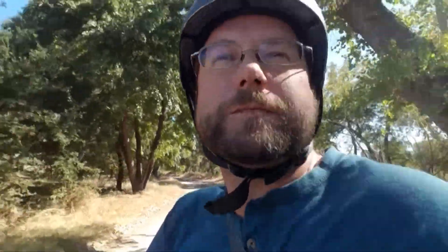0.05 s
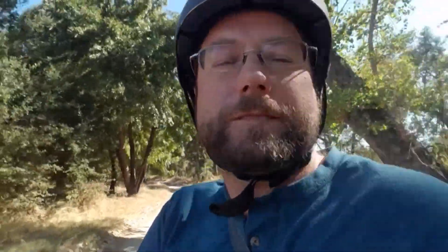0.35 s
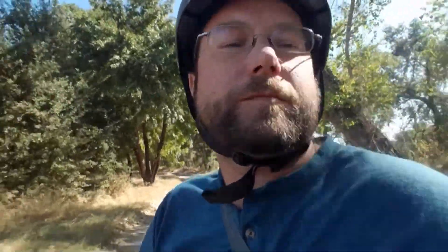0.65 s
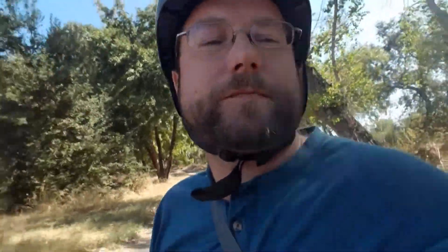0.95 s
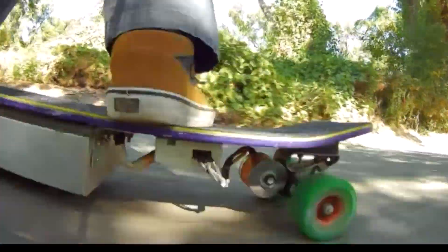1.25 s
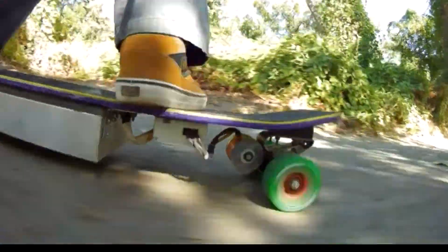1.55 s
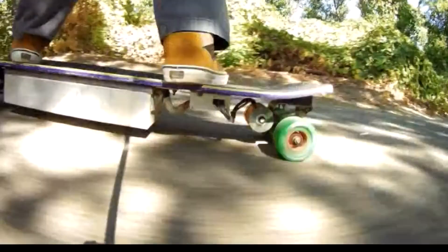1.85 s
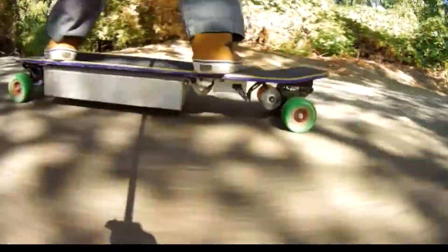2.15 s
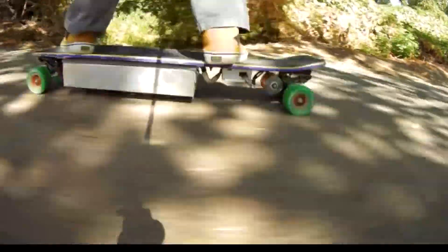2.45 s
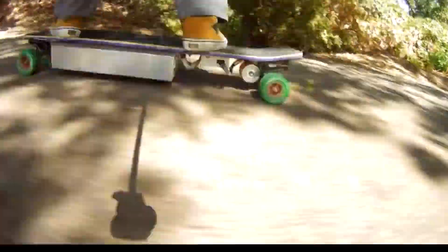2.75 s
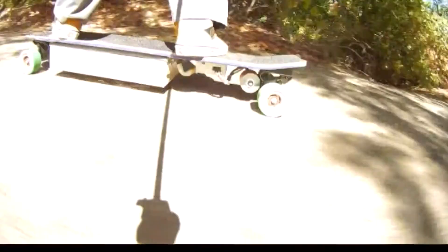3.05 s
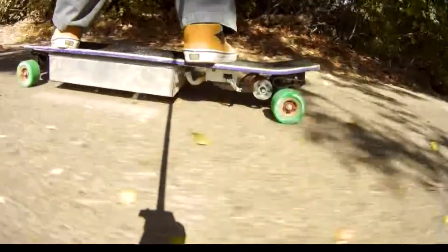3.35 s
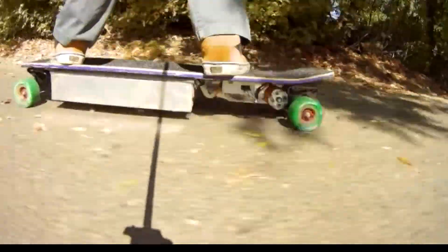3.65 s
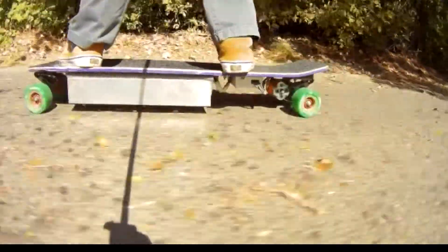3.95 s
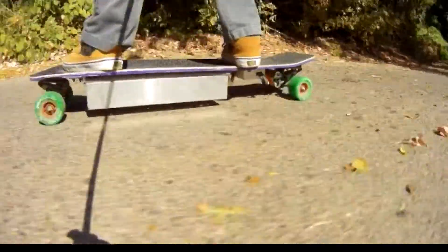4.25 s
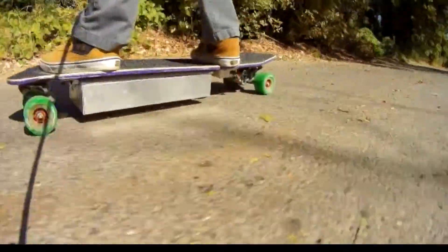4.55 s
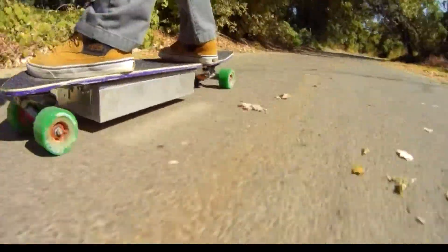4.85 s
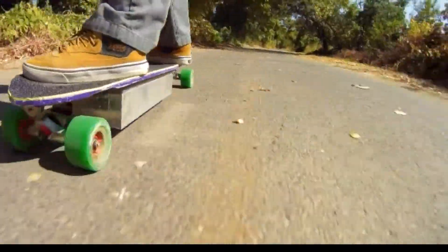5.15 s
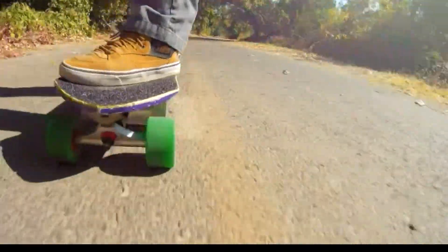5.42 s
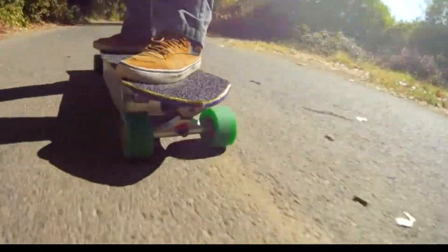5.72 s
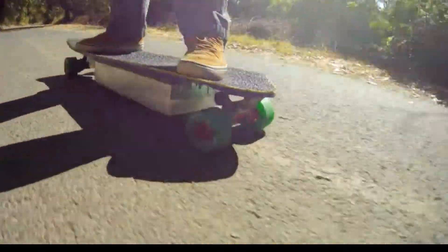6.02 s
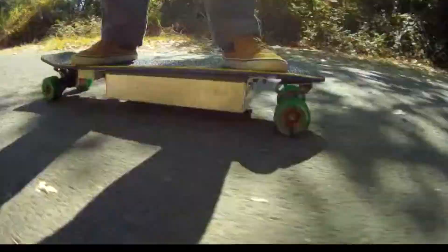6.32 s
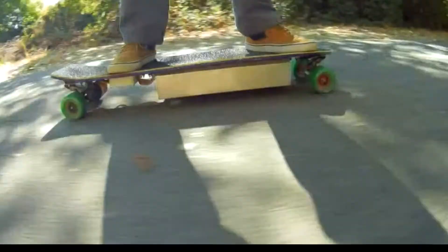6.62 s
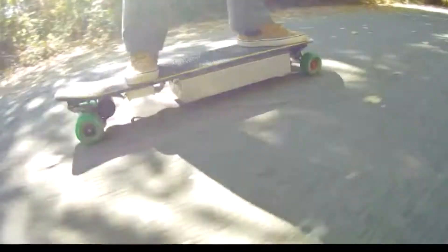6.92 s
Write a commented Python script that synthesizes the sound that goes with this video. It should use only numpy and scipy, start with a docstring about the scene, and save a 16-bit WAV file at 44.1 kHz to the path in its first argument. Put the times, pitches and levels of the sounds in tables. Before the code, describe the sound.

A second of gusty wind cuts to an electric skateboard's wheels roaring over pavement, with pebble knocks, rattles and a thin motor whistle.

```python
"""Wind buffets the microphone at head height, over the faint hiss of an electric skateboard on a path.
After a short silent break the board is heard from beside its wheels: coarse asphalt shakes deck and
wheels, pebbles knock, and loose hardware rattles on the battery box and trucks. The motor drive
whistles, the wheels squeal and scrub in turns, and a bushing groans as the rider leans.
Dry leaves snap under the wheels, loudest at the end."""
import sys
import numpy as np
from scipy import signal
from scipy.fft import rfft, irfft
from scipy.io import wavfile

SR = 44100
rng = np.random.default_rng(int(sys.argv[2]) if len(sys.argv) > 2 else 0)


def waveform_to_disk(signal):
    """Save audio, clipped to [-1, 1], as 16-bit WAV at the path in sys.argv[1]."""
    frames = np.transpose(np.atleast_2d(signal))
    scaled = np.clip(frames, -1, 1) * 32767
    samples = np.round(scaled).astype(np.int16)
    wavfile.write(sys.argv[1], SR, samples)


N = 312228
T = np.arange(N) / SR
WIND_END_S, RIDE_START_S = 1.033, 1.092  # the silent break lies between


# How hard the road drives the board. Each row: time in seconds, then deck rumble, wheel roar and grit
# in relative dB.
ROAD_LEVELS = [(1.1, -20, -22.5, -38.5), (1.45, -24, -27.5, -46.5), (1.78, -23, -24, -44),
               (1.98, -23, -28.5, -48), (2.3, -23.5, -26.5, -46.0), (3.0, -26.5, -29, -48.5),
               (3.2, -26, -27, -47.0), (3.5, -26.9, -26.5, -49), (3.8, -23.5, -26, -45),
               (4.3, -23.5, -27.5, -47.5), (4.5, -28.5, -27, -47), (4.68, -26.5, -23.5, -39.5),
               (5.15, -29, -28, -46), (5.6, -31.5, -31, -43), (5.95, -30, -33.5, -47.5),
               (6.2, -29, -32.5, -46.5), (6.45, -29.5, -24, -47.5), (6.6, -28, -30.0, -48),
               (6.88, -29.4, -25, -49.5), (6.97, -30, -34, -45.9)]


def shaking(s):
    """The road shakes deck, wheels, box and grit: their relative levels in dB at time s."""
    times, *columns = np.transpose(ROAD_LEVELS)
    deck_db, wheel_db, grit_db = [np.interp(s, times, c) for c in columns]
    box_db = 0.68 * wheel_db + 0.32 * grit_db - 4  # the box is shaken through the wheels and by grit
    return np.array([deck_db, wheel_db, box_db, grit_db])


# Fine dust under the wheels. Each row: time in seconds, relative level in dB.
DUST_LEVELS = [(1.1, -59), (2.0, -64), (2.5, -61.5), (3.4, -64), (4.15, -60.5), (5.2, -64.5), (6.1, -65.6),
               (6.3, -63), (6.75, -67)]
# Tone colours: low deck, roaring wheels, clacking battery box, bright grit, fizzing dust.
# Each row: frequency in Hz, gain in dB.
DECK_SPECTRUM = [(20, -19), (45, -15), (80, -11), (130, -5), (200, -0.5), (270, -0.5), (350, 0.5),
                 (450, -1), (600, -1.5), (760, -3.5), (880, -5.5), (1100, -7.5), (1500, -19), (2500, -60.5)]
WHEEL_SPECTRUM = [(500, -40), (900, -5.5), (1150, -6.5), (1370, -1), (1600, -1), (1780, -5.5), (2000, -14),
                  (2300, -14), (3500, -44.5)]
BOX_SPECTRUM = [(1300, -36), (2080, -10), (2420, 2), (2650, -3), (2800, -4.5), (3000, -7), (3300, -12),
                (3700, -14.5), (4600, -34), (6000, -55)]
GRIT_SPECTRUM = [(2200, -32.5), (3400, 2.5), (3900, -2), (4300, -1), (4650, -2), (4950, -8), (5250, -20.5),
                 (5600, -12), (6300, -10), (6700, -16), (7150, -29), (9000, -28), (14000, -49)]
DUST_SPECTRUM = [(4000, -10), (7000, -0.5), (8600, 1.5), (9500, 4), (10600, -8), (11300, -0.5),
                 (12100, 9.5), (13300, -2), (14500, 3), (15600, -6)]


def rolling():
    """Shared asphalt grains set the board's parts ringing, in smoother and rougher patches."""
    patch_db = 0.96 * wander(5.3)
    deck_db, wheel_db, box_db, grit_db = shaking(T) + patch_db
    dust_db, = curves(DUST_LEVELS)
    stones = grains(per_s=2600, spread_db=3.0)
    chips = grains(per_s=130, spread_db=3.5)
    sand = grains(per_s=67, spread_db=1.0)
    coarseness = unit_rms(wander(130) + .55 * wander(22))

    def shaken(spectrum, db, impacts, rough_db, noise=1):
        """One part, driven by impacts and noise that swell with the coarseness."""
        force = (impacts + noise * rng.standard_normal(N)) * gain_of(rough_db * coarseness)
        return resonate(force, spectrum) * gain_of(db)

    deck = shaken(DECK_SPECTRUM, deck_db - 1.82, stones, rough_db=0.94, noise=1.05)
    wheel = shaken(WHEEL_SPECTRUM, wheel_db - 1.5, stones, rough_db=1.5, noise=0.76)
    box = shaken(BOX_SPECTRUM, box_db - 3.7, 0.73 * stones + 0.65 * chips, rough_db=1.6)
    grit = shaken(GRIT_SPECTRUM, grit_db - 1.0, 0.68 * stones + 0.83 * chips, rough_db=0.95)
    dust = shaken(DUST_SPECTRUM, dust_db + 6.0, 0.56 * chips + 0.78 * sand, rough_db=2.4)
    return deck + wheel + box + grit + dust


def grains(per_s, spread_db):
    """Force of small stones under the wheels: many slight, a few large; rms 1."""
    size = gain_of(spread_db * np.minimum(rng.exponential(1, N), 4.5))
    return unit_rms(size * rng.choice([-1, 1], N) * (rng.random(N) < per_s / SR))


# The wind's deep buffet and its brighter flutter. Each row: frequency in Hz, gain in dB.
BUFFET_SPECTRUM = [(12, -65), (20, -8), (65, -1), (124, 0), (196, -2), (276, -5), (370, -7), (570, -16.5),
                   (675, -27), (800, -21.5), (1040, -35), (1760, -120)]
FLUTTER_SPECTRUM = [(290, -28.5), (520, -5), (930, -12), (1390, -21.5), (2090, -31.5), (3200, -40.5),
                    (4600, -46.5), (6500, -58), (10000, -63), (15700, -86)]
# Where the wind sits in stereo. Each row: frequency in Hz, left minus right in dB.
WIND_BALANCE = [(60, 11), (240, 15), (950, 15), (3770, 27), (15000, -15)]
# Eddies hitting the microphone, and at 0.91 s a burst of flutter that comes with the distant hardware taps.
# Each row: time in seconds, slap level in dB, flutter swell in dB.
EDDY_SLAPS = [(0.063, 5, 9), (0.156, 1.5, 6.5), (0.24, -11, 7), (0.382, -4, 8), (0.469, 0, 4.5),
              (0.489, 1, 2.5), (0.65, -2, 8.5), (0.851, 2.5, 0), (0.91, -7, 7.5), (1.018, 8, 7)]


def wind():
    """Eddies buffet each microphone port separately, mostly the left; flutter swells round each slap."""
    buffet_db = -13 - 4.5 * np.exp(-T / 0.066)  # builds up quickly, then holds
    flutter_db = -30 + sum(swell_db * bell(s, width_s=0.033) for s, _, swell_db in EDDY_SLAPS)
    left_over_right_db = spectrum_at(WIND_BALANCE, np.fft.rfftfreq(N, 1 / SR))
    ports = []
    for side in (1, -1):
        buffet = resonate(rng.standard_normal(N), BUFFET_SPECTRUM) * gain_of(buffet_db)
        bursts = rng.standard_normal(N) * gain_of(2.64 * wander(83))
        flutter = resonate(bursts, FLUTTER_SPECTRUM) * gain_of(flutter_db)
        for s, db, _ in EDDY_SLAPS:
            add(flutter, s, gain_of(db) * strike(ring(FLUTTER_SPECTRUM), chatter=1.9, decay_s=0.0027))
        share = np.sqrt(2 / (1 + gain_of(-side * left_over_right_db) ** 2))
        ports.append(irfft(rfft(buffet + flutter) * share, N))
    return np.array(ports)


# Knocks from pebbles and cracks. Each row: start in seconds, then deck, wheel and metal accents in dB,
# riding on the road's level.
PEBBLE_HITS = [(1.11, 3, -6, -8), (1.187, -5, 3, 9), (1.251, 1.5, -8, 9), (1.277, -8, -1, 14.5),
               (1.283, -8, 8.5, 10.5), (1.341, 9, -6, -7), (1.363, -2, 3, 8), (1.58, -14, 3, 13),
               (1.586, -7, 0, 12), (1.593, -12, -5, 12), (1.599, -4, -4, 10), (1.724, 5.5, 7, -9),
               (1.829, -6, -4, 7.5), (2.273, -10, 2.5, 9.5), (2.624, 6.5, 5, -4), (3.157, 0, 7.5, 3),
               (3.628, -10, 4, 10), (3.746, -14, -1, 7.5), (4.439, 4, 3, 9), (5.376, -4, -6, 14),
               (5.382, -2, 11, 17.5), (5.505, -1, 7, 13.5), (6.313, 4, 4, 11), (6.43, 6, -3, 11),
               (6.473, 2, -3, 8), (6.553, 1, -3, 6.5), (6.692, -5, 6, 11.5), (7.007, 6, 18, 20),
               (7.017, 7.5, 9, 13), (7.032, -14, 14, 7), (7.063, 5, 17, -10)]


def pebbles():
    """Each pebble thumps the deck, kicks a wheel and jolts the metal parts."""
    bodies = np.array([ring(DECK_SPECTRUM), ring(WHEEL_SPECTRUM), *hardware()])
    out = np.zeros(N)
    for s, deck_db, wheel_db, metal_db in PEBBLE_HITS:
        levels_db = 23 + shaking(s) + [deck_db, wheel_db, metal_db, metal_db]
        add(out, s, strike(gain_of(levels_db) @ bodies, chatter=0.96, decay_s=0.0048))
    return out


# Bouts of chatter on rough stretches. Each row: start and length in seconds, then box and truck accents
# in dB, riding on the road's level.
RATTLE_BOUTS = [(1.143, .02, -2, 2), (1.228, .01, 2.5, -3), (1.508, .03, 7.5, 5), (1.708, .04, 3, 0),
                (1.775, .07, 3.5, 1), (1.948, .03, 0, 5), (2.15, .06, 3.5, 3.5), (2.25, .05, 6, 4),
                (2.33, .24, 4.5, -6), (2.613, .18, 4, -3), (2.869, .03, 9.5, -4), (2.943, .01, 2, 0),
                (3.195, .03, 2, 6.5), (3.326, .03, 2, 2), (4.999, .01, 1, 4.5), (5.076, .01, 8.5, 5),
                (5.239, .01, 3, 2), (5.552, .01, 0, 2), (5.745, .04, -4, 4), (5.99, .01, -5, 1),
                (6.145, .04, 2, 3.5), (6.269, .07, 0, 3.5), (6.412, .02, 9, 7), (6.931, .01, 1, 6),
                (7.054, .01, 11, -4)]


def rattles(count=150, ticks_per_s=12, gap_s=.03):
    """Loose parts tap box and trucks in stray ticks and uneven runs; each tap bounces once."""
    tick_times = RIDE_START_S + (np.arange(count) + rng.random(count)) / ticks_per_s
    tick_db = -1.5 + 1.5 * rng.standard_normal(count)
    taps = list(zip(tick_times, tick_db, tick_db))
    for start, length, box_accent, truck_accent in RATTLE_BOUTS:
        delays = np.append(0, np.cumsum(gap_s * (.5 + rng.random(count))))
        taps += [(start + s, box_accent, truck_accent) for s in delays[delays < length]]
    box, truck = hardware()
    out = np.zeros(N)
    for s, box_accent, truck_accent in taps:
        _, _, box_db, grit_db = shaking(s) + 25.5
        tap = gain_of(box_db + box_accent) * box + gain_of(grit_db + truck_accent + 3.0) * truck
        add(out, s, strike(tap, chatter=1.5, decay_s=0.0039))
        add(out, s + rng.uniform(0.006, .011), gain_of(-5.5) * tap)  # the bounce
    return out


# Ringing of the aluminium box and of the trucks. Each row: frequency in Hz, relative level in dB,
# seconds to fall by 60 dB.
BOX_RINGING = [(1280, 2, 0.037), (2500, 9, 0.064), (2620, -10, .029), (2810, -10, 0.015)]
TRUCK_RINGING = [(4610, 9, 0.016), (4700, -7, 0.014), (6210, -9.5, 0.042)]


def hardware():
    """How the battery box and the trucks answer a tap."""
    box = metal(BOX_SPECTRUM, BOX_RINGING, ring_db=-14.5)
    truck = metal(GRIT_SPECTRUM, TRUCK_RINGING, ring_db=-9.0)
    return box, truck


def metal(spectrum, modes, ring_db):
    """A dull clack that leaves a few modes ringing, energy 1."""
    clack = ring(spectrum)
    t = np.arange(len(clack)) / SR
    tones = sum(gain_of(db - 60 * t / t60) * np.sin(2 * np.pi * hz * t) for hz, db, t60 in modes)
    return unit_energy(clack + gain_of(ring_db) * unit_energy(tones))


# Leaves under the wheels. Each row: start in seconds, relative level in dB.
LEAF_SNAPS = [(1.143, -34), (1.3, -38), (1.736, -37), (3.7329, -38), (3.78, -39), (4.1153, -37),
              (4.2832, -41), (5.078, -39), (5.505, -40), (6.148, -40), (6.2956, -39), (6.425, -39),
              (6.924, -36), (6.9664, -32), (6.996, -26.5), (7.005, -28), (7.03, -36)]
# A dry leaf's crisp colour. Each row: frequency in Hz, gain in dB.
LEAF_SPECTRUM = [(1500, -32), (3500, 11), (6000, -6), (7500, -4), (9200, 3), (11000, 2), (13000, -4),
                 (15800, -2)]


def leaves():
    """Dry leaves break with short bright snaps, then crumble."""
    leaf, out = ring(LEAF_SPECTRUM), np.zeros(N)
    for s, db in LEAF_SNAPS:
        add(out, s, gain_of(db + 18.5) * strike(leaf, chatter=3.1, decay_s=0.0016))
        add(out, s, gain_of(db + 17.5) * strike(leaf, chatter=20, decay_s=0.038, size=4096))  # crumbs
    return out


# Rasps as the rider carves. Each row: peak time and half length in seconds, centre in Hz, peak in dB.
CARVES = [(4.705, 0.25, 1950, -27.5), (4.964, 0.12, 1950, -28.5), (6.768, 0.071, 1900, -31),
          (6.88, 0.047, 1900, -34)]


def scrubs(edge_db=14.5):
    """Wheels scrub sideways in a broad rasp that starts and ends edge_db under its peak."""
    out = np.zeros(N)
    for s, half_s, hz, db in CARVES:
        swell = [(s - half_s, hz, db - edge_db), (s, hz, db), (s + half_s, hz, db - edge_db)]
        out += stick_slip(swell, width_hz=740, steady=0)
    return out


# A thin, falling squeal. Each row: time in seconds, pitch in Hz, level in dB.
SQUEAL_GLIDE = [(3.93, 1595, -42), (3.99, 1574, -27), (4.04, 1555, -30.5), (4.1, 1520, -30.5),
                (4.17, 1500, -50)]


def wheel_squeal():
    """Wheels sliding sideways in a turn slip steadily enough to sing."""
    return stick_slip(SQUEAL_GLIDE, width_hz=42, steady=3.5)


# A short, rising groan. Each row: time in seconds, pitch in Hz, level in dB.
GROAN_GLIDE = [(6.66, 382, -44), (6.75, 407, -24), (6.82, 417, -55)]


def bushing_groan():
    """A truck bushing slips unevenly as the rider leans."""
    return stick_slip(GROAN_GLIDE, width_hz=25, steady=0.58)


def stick_slip(glide, width_hz, steady):
    """Rubber that grips and slips sings in a resonance; the steadier the slips, the purer the tone."""
    hz, db = curves(glide)
    slips = (steady + wander(width_hz) + 1j * wander(width_hz)) / np.sqrt(1 + steady ** 2 / 2)
    tone = (slips * np.exp(2j * np.pi * np.cumsum(hz) / SR)).real
    return tone * gain_of(db) * (T > glide[0][0]) * (T < glide[-1][0])


# The drive's two families of whistles. Each row: frequency in Hz, relative level in dB.
LOW_WHISTLES = [(9580, 0), (9935, -6), (10048, -14), (10104, -15), (9163, -18)]
HIGH_WHISTLES = [(10402, 0), (10640, -5), (10280, -11), (10815, -16), (12056, -9), (7935, -19)]
# Their strength close up. Each row: time in seconds, then low and high family in relative dB.
WHISTLE_LEVELS = [(1.1, -41, -43.5), (1.45, -47, -55), (1.65, -54, -51), (2.2, -56, -54), (3.0, -64, -53.6),
                  (3.6, -60.6, -51.5), (4.0, -63.5, -61), (4.35, -64.1, -56), (4.9, -69, -61.0),
                  (5.15, -63, -64), (5.6, -61, -77), (5.85, -67.8, -71.9), (6.05, -62, -68),
                  (6.45, -63, -55.5), (6.7, -59, -70), (6.95, -70, -57)]


def motor(far_low_db=-65, far_high_db=-76, coast_start_s=.69):
    """Two families of whistles trade strength as the load changes; they stop while the rider coasts."""
    low_db, high_db = np.where(T < WIND_END_S, [[far_low_db], [far_high_db]], curves(WHISTLE_LEVELS))
    driven = (T < coast_start_s) | (T > WIND_END_S)
    low = whistle(LOW_WHISTLES, waver_hz=6.9, flutter_db=2.0, skirt=0.26) * gain_of(low_db - 3.0)
    high = whistle(HIGH_WHISTLES, waver_hz=7.0, flutter_db=2.0, skirt=0.35) * gain_of(high_db - 3.5)
    return (low + high) * driven


# The drive's slow pitch drift. Each row: time in seconds, offset in Hz.
DRIVE_DRIFT = [(0, 1.5), (1.1, -5), (2.5, 2), (4.5, 13), (7.08, 15.5)]


def whistle(lines, waver_hz, flutter_db, skirt):
    """The drive's switching tones waver and flutter as the board shakes, each over a noisy skirt."""
    drift_hz, = curves(DRIVE_DRIFT)
    shift_cycles = np.cumsum(drift_hz + waver_hz * wander(25)) / SR
    tones = 0
    for hz, db in lines:
        strength = gain_of(db + flutter_db * wander(14)) * (1 + skirt * wander(220))
        tones += strength * np.sin(2 * np.pi * (hz * T + shift_cycles + rng.random()))
    return np.sqrt(2) * tones


# The board's thin hiss at head height. Each row: frequency in Hz, gain in dB.
FAR_SPECTRUM = [(300, -3), (1200, 5.5), (2400, -3), (3300, -6), (4200, -15.5), (5200, -17), (6500, -30),
                (8000, -39), (15000, -33)]
# Its rattles from up there. Each row: start in seconds, relative level in dB.
FAR_RATTLES = [(0.0657, -38), (0.7706, -30), (0.866, -35), (0.881, -20.5), (0.902, -21), (0.924, -25)]


def far_board():
    """From head height the wheels are a faint hiss, with a few taps of hardware."""
    road = rng.standard_normal(N) * gain_of(1.4 * wander(70))
    out = resonate(road, FAR_SPECTRUM) * gain_of(-46.5)
    box, truck = hardware()
    for s, db in FAR_RATTLES:
        add(out, s, gain_of(db + 2.5) * strike(box + truck, chatter=0.66, decay_s=0.0021))
    return out


# Light gusts beside the board. Each row: start and end of the plateau in seconds, level in dB.
BREEZE_GUSTS = [(3.62, 4.75, -43.5), (6.55, 6.75, -44)]
# Their soft rumble. Each row: frequency in Hz, gain in dB.
BREEZE_SPECTRUM = [(18, -8), (35, -1), (70, -2), (110, 5), (180, -6.5), (350, -37)]


def breeze(calm_db=-58.5, edge_s=0.078):
    """A low wind rumble comes and goes as the microphone swings on a hand-held pole."""
    gusts = sum(gain_of(db) * bell(np.clip(T, start, end), edge_s) for start, end, db in BREEZE_GUSTS)
    return resonate(rng.standard_normal(N), BREEZE_SPECTRUM) * (gain_of(calm_db) + gusts)


def strike(body, chatter, decay_s, size=512):
    """Hits a body's impulse response with a sharp push followed by a brief chatter."""
    tail = rng.standard_normal(size) * np.exp(-np.arange(size) / SR / decay_s)
    force = chatter * unit_energy(tail)
    force[0] += 1
    return np.convolve(unit_energy(force), body)


def ring(spectrum, size=4096):
    """Minimum-phase impulse response of a body with this spectrum, energy 1."""
    hz = abs(np.fft.fftfreq(size, 1 / SR))
    octaves_past_end = np.log2(np.maximum(hz / spectrum[-1][0], 1))
    log_gain = np.log(gain_of(spectrum_at(spectrum, hz) - 20 * octaves_past_end) + 1e-5)
    transfer = np.exp(np.conj(signal.hilbert(log_gain)))
    return unit_energy(np.fft.ifft(transfer).real[:size // 2])


def resonate(force, spectrum):
    """A force played through a body, rms 1."""
    return unit_rms(signal.oaconvolve(force, ring(spectrum))[:N])


def wander(hz):
    """Random motion of rms 1, rolled off above hz."""
    f = np.fft.rfftfreq(N, 1 / SR)
    return unit_rms(irfft(rfft(rng.standard_normal(N)) / (1 + (f / hz) ** 4), N))


def bell(s, width_s):
    """A smooth swell of height 1 around time s."""
    return np.exp(-.5 * ((T - s) / width_s) ** 2)


def spectrum_at(points, hz):
    """Reads a spectrum on a log-frequency axis."""
    f, db = np.transpose(points)
    return np.interp(np.log(hz + 1), np.log(f + 1), db)


def curves(rows):
    """Each column of a timed table, sample by sample."""
    times, *columns = np.transpose(rows)
    return [np.interp(T, times, c) for c in columns]


def add(mix, s, sound):
    """Mixes a sound in at time s."""
    part = mix[max(round(s * SR), 0):][:len(sound)]
    part += sound[:len(part)]


def gain_of(db):
    """Decibels to amplitude."""
    return 10 ** (np.asarray(db) / 20)


def unit_rms(x):
    """Scales to rms 1."""
    return x / np.sqrt(np.mean(x ** 2) + 1e-20)


def unit_energy(x):
    """Scales to energy 1."""
    return x / np.linalg.norm(x)


def scene():
    """Wind at head height, a short break, then the board close up and centred."""
    whine = motor()
    squeaks = wheel_squeal() + bushing_groan()
    board = rolling() + pebbles() + rattles() + leaves() + scrubs() + squeaks
    at_head = wind() + far_board() + whine
    at_wheels = board + breeze() + whine
    return at_head * (T < WIND_END_S) + at_wheels * (T > RIDE_START_S)


def record(dry, ceiling=.97, cutoff_hz=15850):
    """Rounds off the strongest gusts near full scale, then cuts the highest treble."""
    rounded = dry / (1 + (dry / ceiling) ** 8) ** (1 / 8)
    lowpass = signal.firwin(511, cutoff_hz, window=("kaiser", 9), fs=SR)
    return signal.oaconvolve(rounded, lowpass[None], "same")


dry = scene()
out = record(dry)
waveform_to_disk(out)
```